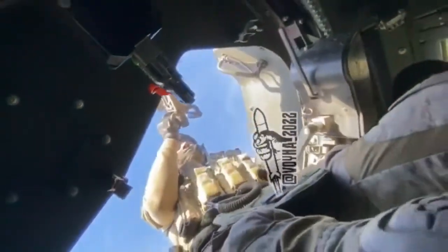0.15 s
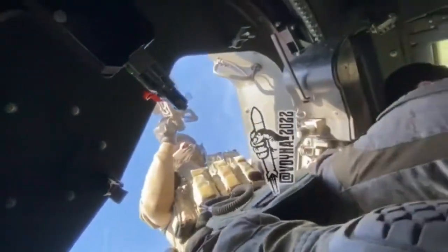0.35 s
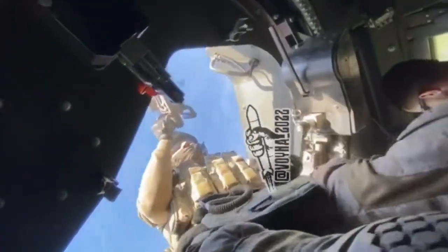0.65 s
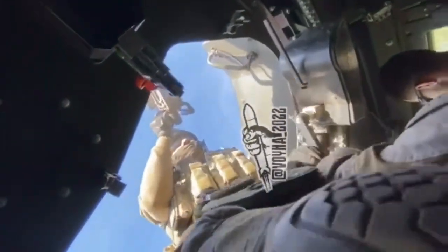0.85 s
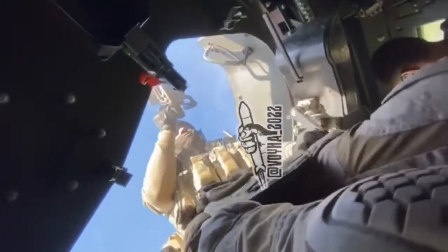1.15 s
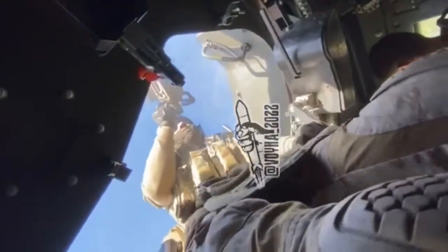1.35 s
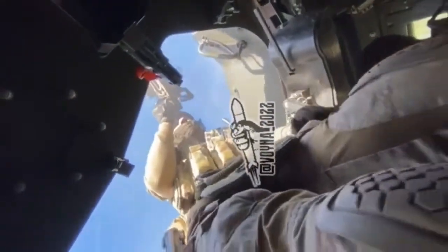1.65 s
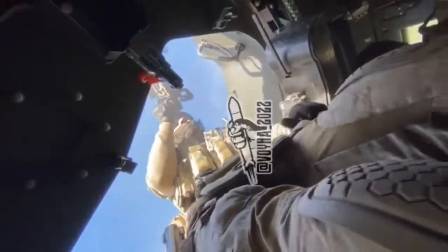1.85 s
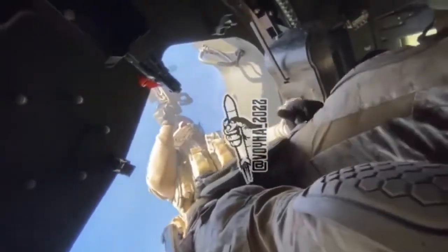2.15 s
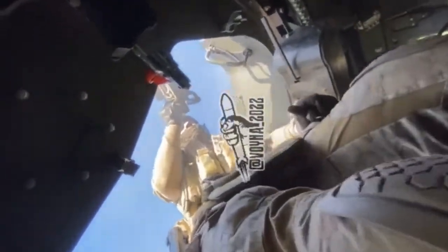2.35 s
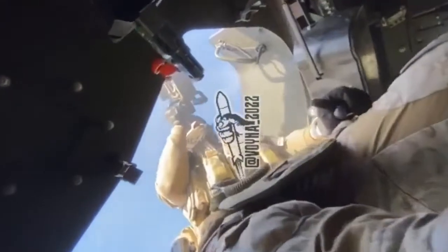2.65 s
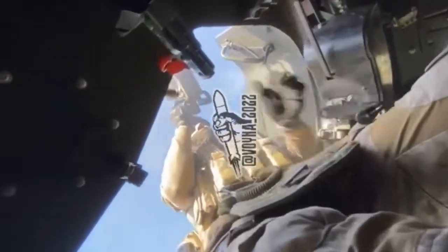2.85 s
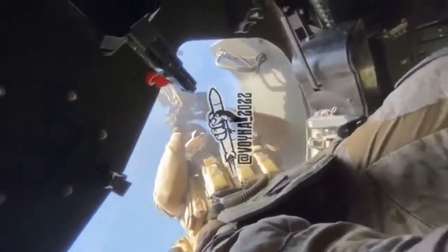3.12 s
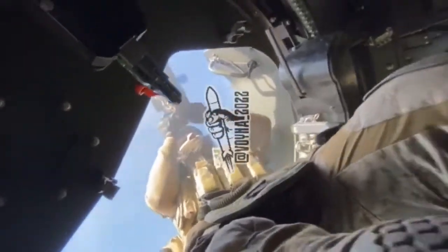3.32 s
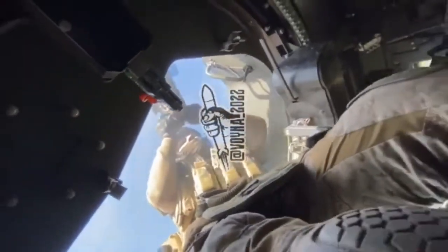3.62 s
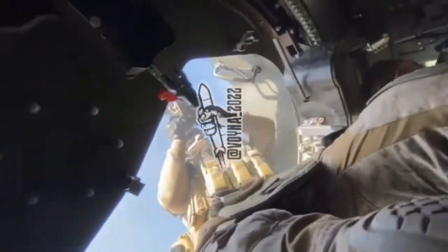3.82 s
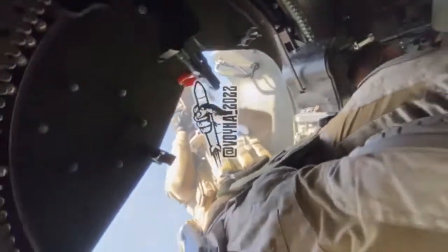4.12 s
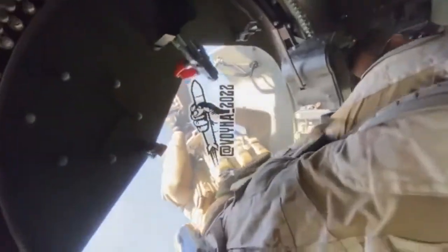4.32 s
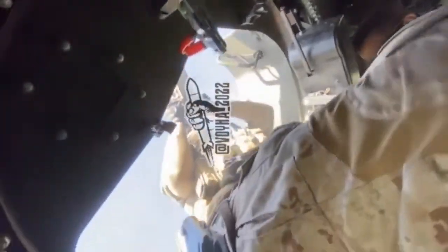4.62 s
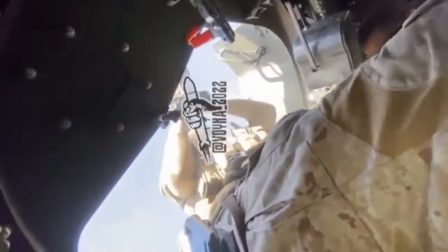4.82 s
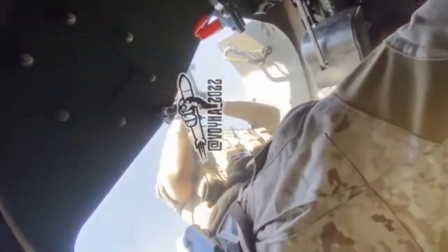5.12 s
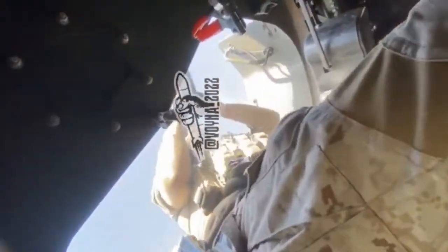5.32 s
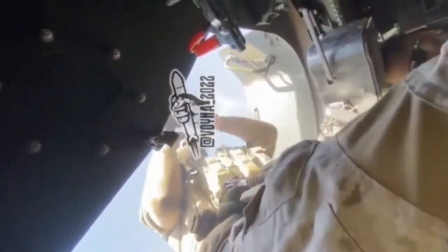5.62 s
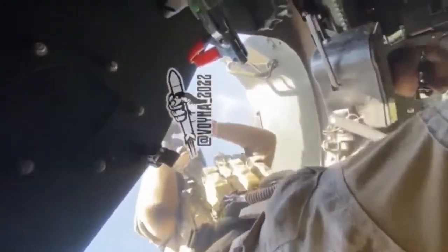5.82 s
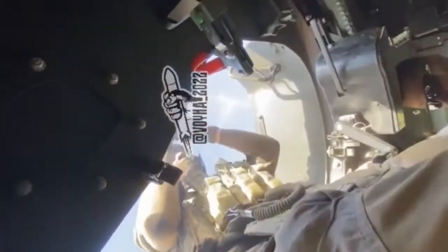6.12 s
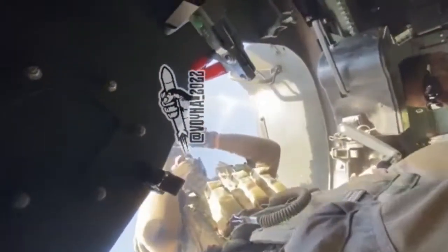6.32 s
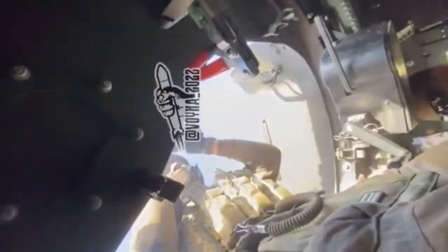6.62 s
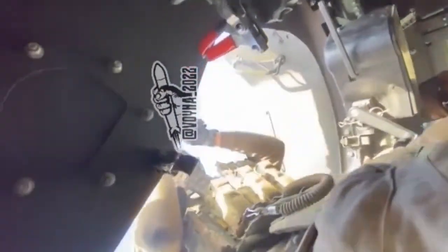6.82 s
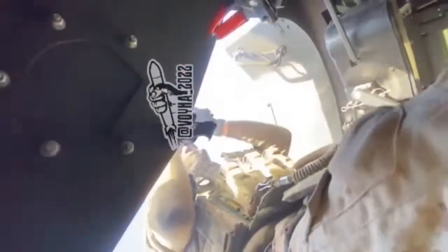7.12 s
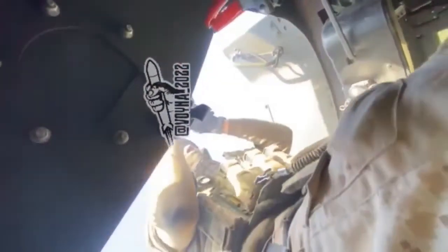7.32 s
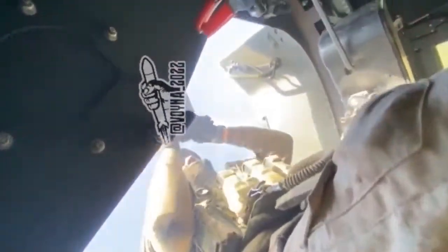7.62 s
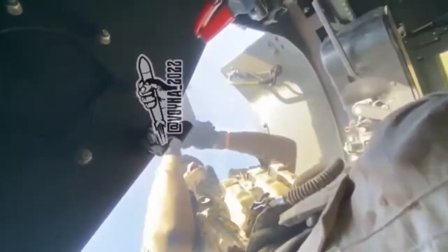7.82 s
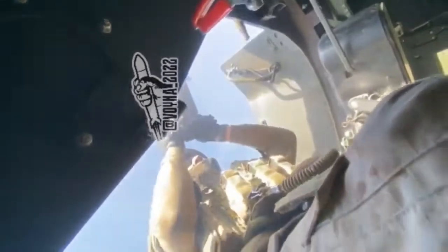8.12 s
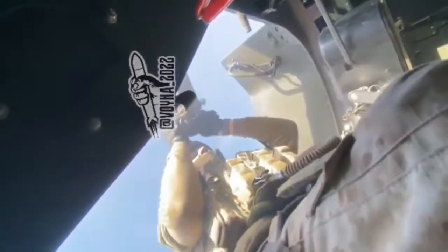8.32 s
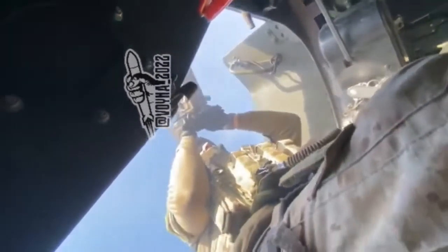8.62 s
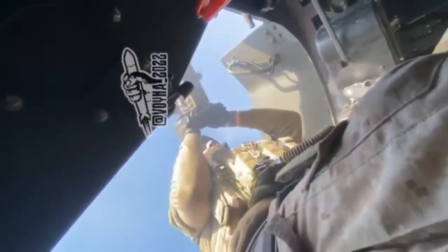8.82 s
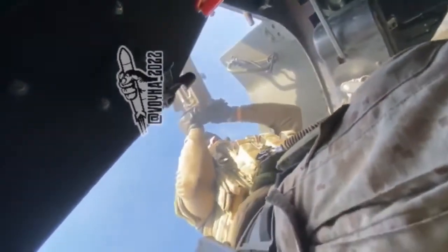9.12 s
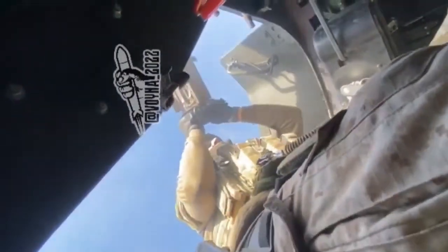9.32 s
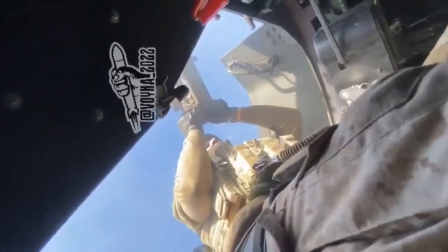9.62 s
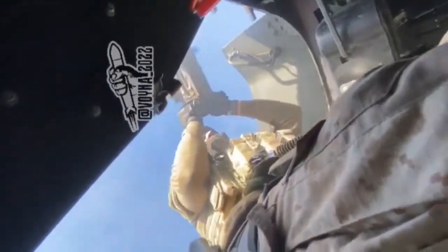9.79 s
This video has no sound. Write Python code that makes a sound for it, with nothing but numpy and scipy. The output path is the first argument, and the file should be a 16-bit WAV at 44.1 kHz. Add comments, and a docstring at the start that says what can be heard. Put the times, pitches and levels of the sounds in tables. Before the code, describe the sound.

Close, continuous heavy machine gun fire hammers through an open vehicle hatch, with clattering steel, clinking cases and a low rumble.

```python
"""Hard, booming shots hammer overhead: one long burst from a heavy machine gun on a vehicle's roof mount,
heard from the cabin under the open hatch. Each muzzle blast cracks through the hatch and booms in the
cabin air; between rounds the bolt slams back, drags the belt in and closes again. Spent metal clinks,
recoil shakes hull and mount, the standing vehicle rumbles, and a limiter flattens the blasts."""
import sys
import numpy as np
from scipy import signal
from scipy.fft import rfft, irfft
from scipy.io import wavfile
from scipy.ndimage import uniform_filter1d, minimum_filter1d

SR = 44100
rng = np.random.default_rng(int(sys.argv[2]) if len(sys.argv) > 2 else 0)


def unload_audio(sound):
    """Save the sound as a 16-bit wav file, at the path given as the first command line argument."""
    columns = np.transpose(np.atleast_2d(sound))
    # keep every value between -1 and 1, then stretch to whole-number steps
    steps = np.round(np.clip(columns, -1, 1) * 32767)
    wavfile.write(sys.argv[1], SR, steps.astype(np.int16))


N = 438794
SIZE, LEAD = 12288, 1024  # samples in a one-shot, and in its pre-roll
AGE = (np.arange(SIZE) - LEAD) / SR  # seconds since the hit
HZ, SCENE_HZ = np.fft.rfftfreq(SIZE, 1 / SR), np.fft.rfftfreq(N, 1 / SR)
SIDES = np.array([[.5], [-.5]])  # splits a left-minus-right level between the channels
SNAP_S = .0006  # attack of a sharp transient


def undb(db):
    """Decibels to gain."""
    return 10 ** (np.asarray(db) / 20)


def curve(points, hz=HZ):
    """Read (f/Hz, value) breakpoints on a log-frequency axis."""
    f, value = np.transpose(points)
    return np.interp(np.log(hz + 1), np.log(np.abs(f) + 1), value)


def level_at(times, points):
    """Read a (t/s, level/dB) fader ride at each round."""
    return np.interp(times, *np.transpose(points))[:, None, None]


def bell(hz, width_hz, db):
    """One resonance as an EQ bell, in dB over frequency."""
    return db / (1 + (2 * (HZ - hz) / width_hz) ** 2)


def causal(db):
    """Minimum-phase response with this gain: it rings only after the hit."""
    cepstrum = irfft(db * np.log(10) / 20)
    fold = 1 + np.sign(np.sin(2 * np.pi * np.arange(SIZE) / SIZE))
    return np.exp(rfft(cepstrum * fold))


def colour(x, db):
    """EQ by a dB shape scaled to unit mean power."""
    response = causal(db)
    return irfft(rfft(x) * response / np.sqrt(np.mean(np.abs(response) ** 2, axis=-1, keepdims=True)))


def blow(at, rise, t60):
    """Envelope that swells to a peak and dies away; all times in seconds."""
    gap = np.abs(AGE - at)
    return np.where(AGE < at, np.exp(-gap / rise), np.exp(-np.log(1000) * gap / t60))


def swell(times, at, span):
    """Share of a resonance that each round excites, fullest at one moment of the mount's turn."""
    return np.exp(-((times[:, None, None] - at) / span) ** 2)


def place(times, sounds):
    """Lay one stereo one-shot on the timeline at each time."""
    track = np.zeros((2, N + 2 * SIZE))
    for s, sound in zip(times, sounds):
        i = int(round(s * SR))
        track[:, i:i + SIZE] += sound
    return track[:, LEAD:LEAD + N]


# phase between the channels: f/Hz, left lead/rad
STEREO_PHASE = [(0, 0.34), (430, -0.0), (690, -1.9), (2580, -3.8), (4130, -8.2), (4650, -8.4), (5000, -9.3),
                (5860, -9.5), (8530, -8.9), (10100, -9.6)]
# how alike the channels are: f/Hz, coherence/0-1
STEREO_LIKENESS = [(25, 0.63), (70, 1), (160, 1), (320, 0.75), (600, 0.51), (1200, 0.16), (2500, 0.078),
                   (5000, 0.92), (10000, 0.76)]
def air_noise(count, size=SIZE):
    """Stereo white noise, tight in the bass and wide in the mids: (count, 2, size)."""
    hz = np.fft.rfftfreq(size, 1 / SR)
    left, other = rfft(rng.standard_normal((count, 2, size))).transpose(1, 0, 2)
    likeness = np.clip(curve(STEREO_LIKENESS, hz), 0, 1)
    lag = np.exp(-1j * np.interp(hz, *np.transpose(STEREO_PHASE)))
    right = (likeness * left + np.sqrt(1 - likeness ** 2) * other) * lag
    return irfft(np.stack([left, right], axis=1), size)


# tone of the idling vehicle: f/Hz, level/dB
IDLE_EQ = [(20, -14), (50, -4), (85, 0.5), (150, 0), (270, -18.5), (400, -6.5), (600, -15), (1500, -19.5),
           (2700, -24.5), (5000, -28), (9000, -34), (11000, -58.5)]
def idle(db=-36):
    """The standing vehicle's steady rumble, a bed under everything."""
    rumble = irfft(rfft(air_noise(1, size=N)[0]) * undb(curve(IDLE_EQ, SCENE_HZ)), N)
    return undb(db) * rumble / rumble.std()


# tone of steel hitting steel: f/Hz, level/dB
STEEL_EQ = [(120, -6.5), (300, 12), (450, 10), (700, 6.5), (1500, 0.5), (2600, 2), (4000, -2.5), (5500, -4),
            (7500, -11), (9500, -10.5), (11000, -52)]
# ringing modes of receiver, mount and links: f/Hz, level/dB, t60/s
STEEL_MODES = [(840, -3.5, 0.091), (1040, -2, .06), (2048, -1.5, .06), (2656, -0.5, 0.038),
               (3495, -4.5, 0.031), (4210, -1.5, 0.032), (4650, -1.5, 0.045), (6470, -5, 0.15)]
def steel(force, ring_db=-9, ripple_db=3.5, favour_db=5, detune=0.0065):
    """Steel parts clash under a force envelope: contact noise, plus the modes it sets ringing."""
    count = len(force)
    contact = air_noise(count) * force
    t = np.arange(SIZE) / SR
    # each hit lands on another spot and favours other resonances
    favour, stretch = rng.standard_normal((count, 2, len(STEEL_MODES), 1, 1)).transpose(1, 2, 0, 3, 4)
    modes = sum(undb(db + favour_db * lift) * np.sin(2 * np.pi * hz * (1 + detune * bend) * t)
                * np.exp(-np.log(1000) * t / t60)
                for (hz, db, t60), lift, bend in zip(STEEL_MODES, favour, stretch))
    ripple = rng.standard_normal((count, 1, len(HZ)))
    ripple = uniform_filter1d(uniform_filter1d(ripple, size=130), size=80)
    body = colour(contact, curve(STEEL_EQ) + ripple_db * ripple / ripple.std())
    ring = irfft(rfft(contact) * rfft(modes) / np.linalg.norm(modes, axis=-1, keepdims=True))
    return body + undb(ring_db) * ring


# cues for falling metal: t/s, level/dB, ring against contact/dB
CLINK_CUES = [(0.015, -27, -4), (0.099, -36, -8), (0.9333, -26, -6), (1.262, -32, -12), (1.765, -33, 1),
              (1.923, -35, -4), (2.097, -31, -15), (2.978, -31.5, -11), (3.393, -31, 2), (3.428, -41, -4),
              (3.504, -24, -14), (3.556, -22.5, -20), (3.9586, -22.5, -13), (4.661, -31.5, -6),
              (4.822, -31, -8), (5.194, -40, -8), (5.369, -33, -6), (5.656, -36, -7), (5.995, -37, -6),
              (6.129, -30.5, -15), (6.447, -33.5, -4), (6.758, -34, -5), (7.213, -35, -4), (7.367, -35, 3),
              (7.382, -30.5, -9), (7.847, -37, -5), (7.937, -34, -12), (7.964, -31, -12), (8.272, -32, -8),
              (9.168, -42, -8), (9.665, -37, 1)]
def clinks():
    """Spent cases and links land, each with a sharp tap and a short ring."""
    times, db, ring_db = np.transpose(CLINK_CUES)
    taps = undb(db)[:, None, None] * blow(0.0008, SNAP_S, 0.065)
    return place(times, steel(taps, ring_db[:, None, None]))


def chatter(count, per_s=170, spread_db=3, fade_s=.005, scrape=.45):
    """Envelope of loose steel: quick knocks of uneven size over a steady scrape."""
    hits = rng.random((count, 1, SIZE)) < per_s / SR
    sizes = undb(spread_db * np.clip(rng.standard_normal(hits.shape), -2, 2))
    energy = signal.lfilter([1], [1, -np.exp(-1 / SR / fade_s)], hits * sizes ** 2)
    return np.sqrt(scrape + (1 - scrape) * energy / energy.mean())


def bolt(times, feed_db, last_cycle_s=0.15, jitter_s=0.006, link_db=-38, link_count=4):
    """The bolt locks just before the shot, hits the buffer, pulls the belt and runs home; links tick."""
    cycle = np.append(np.diff(times), last_cycle_s)[:, None, None]
    slip = jitter_s * rng.standard_normal((len(times), 3)).T[..., None, None]
    lock = undb(-24) * blow(-0.0033, 0.0027, 0.045)
    buffer = undb(-32.5 + 0.17 * (feed_db - feed_db.mean())) * blow(0.047 + slip[0], 0.019, 0.12)
    belt = undb(feed_db + 6) * blow(0.108 + slip[1], 0.0098, 0.25)
    forward = undb(feed_db + 5.5) * blow(cycle - 0.014 + slip[2], 0.01, 0.29)
    ticks = rng.uniform(0.039, 0.21, (len(times), link_count)).T[..., None, None]
    link_power = sum((undb(link_db) * blow(at, .0003, 0.034)) ** 2 for at in ticks)
    rattle_power = chatter(len(times)) ** 2 * (buffer ** 2 + belt ** 2 + forward ** 2)
    return steel(np.sqrt(lock ** 2 + rattle_power + link_power))


# peaks and notches of the hatch:
# f/Hz, width/Hz, level/dB, fullest at t/s, fade span/s, left minus right/dB, slide/(Hz/s)
HATCH_BANDS = [(285, 80, 6.5, 7.02, 1.77, 1.5, -3), (346, 20, 2.5, 7.8, 2, -2.5, 0),
               (442, 87, 6, 8.6, 3.2, 4, -3.5), (470, 67, 4, 5.1, 1.1, -1, -2),
               (521, 70, -8, 0.92, 3.5, 3.5, 9.5), (470, 220, -3.5, 3.9, .8, 0.5, -1),
               (520, 57, -3.5, 6.1, .6, 1, 0), (557, 40, 7.5, 7.6, 1.9, 1.5, 0),
               (587, 66, 8.5, 4.4, 0.62, -4, -3), (656, 74, 10.5, 7, 1.52, -6, -4),
               (747.4, 115, 5, 0.9, 6.3, -7.1, 15), (765, 320, 4.5, 0.2, 5.6, -0.6, -17),
               (820, 82, 8, 7, 1.1, 6.5, -7), (850, 78, 0.5, 3.07, 0.97, -2, 4),
               (976, 41, 6, 7.8, 1.2, -4, 9), (980, 70, 3, 3.5, 1.6, 1, 3.5),
               (960, 46, 1.5, 0.1, 0.9, 5.5, 7), (1187, 115, 8, 4.26, 3.6, -2, 2.5),
               (1243, 190, 8.5, 9.5, 0.53, -4, -3), (1430, 240, 4, 5.05, 0.91, -2.5, 1.5),
               (1528, 110, 9.5, 1.5, 2.2, -2.5, 10), (2167, 64, 5, 2, 1, -2.5, -1),
               (1550, 65, 7.5, 7.7, 1.8, -2.5, 4.5), (1910, 38, 1.5, 2, 0.57, 5, -9),
               (2084, 84, 4.5, 0.6, .7, 7.5, 3.5), (2250, 180, 4, 0.2, 9.5, -0.5, -19.5),
               (2260, 100, 8.5, 9.05, 0.52, -1, 33), (2520, 150, 8, 9.55, .7, 0, 50),
               (2680, 530, 4, 6, 6, 0, -21.5), (3000, 58, 3.5, 0.22, .5, 5, 9),
               (3140, 230, 11.5, 2.8, 0.27, -4, 0), (3180, 170, 1, 8.7, 2.7, -1.5, 3.5),
               (3430, 56, 9, 5, 0.41, 9, -6), (4030, 140, 0.5, 2.8, 2.1, -11.8, 24.5)]
def hatch_eq(times):
    """The hatch's EQ in dB per round and channel: resonances swell, slide and fade as the mount turns."""
    gains, shapes = [], []
    for hz, width_hz, db, at, span, pan_db, slide in HATCH_BANDS:
        gains.append((db + pan_db * SIDES) * swell(times, at, span))
        shapes.append(bell(hz + slide * (times[:, None] - at), width_hz, 1))
    return np.concatenate(gains, axis=-1) @ np.stack(shapes, axis=1)


def flatten(x, amount=0.86, bins=23):
    """Iron out a noise burst's chance spectral peaks, so that the EQ after it decides its colour."""
    power = uniform_filter1d(np.abs(rfft(x)) ** 2, size=bins)
    power = np.maximum(power / power.mean(axis=-1, keepdims=True), 1e-4)
    return irfft(rfft(x) * causal(-10 * amount * np.log10(power)))


# tone of the shock front: f/Hz, level/dB
CRACK_EQ = [(150, -31), (350, 8), (550, 0), (800, -2), (1100, -2), (1700, -7), (2400, -10), (4000, -12.5),
            (5500, -14), (7200, -19.5), (9500, -25.5), (11000, -53), (15500, -66)]
def crack(hatch_db, trim_db=-8, t60=0.046, memory=0.889, fresh_hz=2600, bite_db=0.8, bite_hz=4500):
    """The shock front scatters round the cabin; its pattern drifts slowly, its treble is new each round."""
    count = len(hatch_db)
    pattern = air_noise(count)
    for k in range(1, count):
        pattern[k] = memory * pattern[k - 1] + np.sqrt(1 - memory ** 2) * pattern[k]
    carried = 0.86 / (1 + (HZ / fresh_hz) ** 2)
    scatter = irfft(rfft(pattern) * np.sqrt(carried) + rfft(air_noise(count)) * np.sqrt(1 - carried))
    # direct hit, then slaps off rim, floor, wall and roof: t/s, level/dB
    arrivals = [(0, 1.5), (0.0017, 0), (0.0058, -4), (0.0095, -4), (0.014, -7)]
    early_power = sum((undb(db) * blow(at, SNAP_S, t60)) ** 2 for at, db in arrivals)
    tail = undb(-18) * blow(0.014, .003, 0.18)
    burst = flatten(scatter * np.sqrt(early_power + tail ** 2))
    # a steeper shock front gives some rounds more bite
    bite = bite_db * rng.standard_normal((count, 1, 1)) * HZ ** 2 / (HZ ** 2 + bite_hz ** 2)
    return undb(trim_db) * colour(burst, curve(CRACK_EQ) + hatch_db + bite)


# tone of the pressure wave in the cabin: f/Hz, level/dB
BOOM_EQ = [(25, -35.5), (50, -20.5), (80, 1.5), (120, 4), (170, 4.5), (230, -2.5), (330, -3.5), (420, -1),
           (490, -1.5), (570, -21.5), (800, -17.5), (1250, -18.5), (2200, -46.5), (6000, -100)]
# standing waves and nulls of the cabin: f/Hz, width/Hz, level/dB
CABIN_MODES = [(189, 55.4, 7.5), (213.4, 16, -1.5), (230.4, 16.8, 6), (273.7, 46, 6), (302.5, 9.1, -13),
               (358, 58, 3.5), (389, 19.4, -13.5), (406, 13, 4), (480, 12, -1.5)]
def boom(hatch_db, trim_db=-8, start_s=0.00091, late_s=0.014675, late_hz=135, echo_s=0.0038):
    """One pressure wave rings the cabin every round; the lows arrive late, so it sweeps downward."""
    body_db = curve(BOOM_EQ) + sum(bell(*mode) for mode in CABIN_MODES)
    delay_s = start_s + late_s / (1 + ((HZ - late_hz) / 75) ** 2) + LEAD / SR
    sweep = np.exp(-2j * np.pi * np.cumsum(delay_s) * HZ[1])
    # the far wall's echo meets left and right in opposite polarity
    echo = 0.07 * np.exp(-2j * np.pi * HZ * echo_s) * np.array([[1], [-1]])
    wave = irfft(causal(body_db + hatch_db) * sweep * (1 + echo))
    punch = wave[..., (AGE > 0) & (AGE < .035)]
    return wave * undb(trim_db) / np.sqrt(np.mean(punch ** 2))


def gust(count, db=-28, corner_hz=75):
    """The blast's gust buffets left and right separately with a low thud."""
    puff = rng.standard_normal((count, 2, SIZE)) * blow(0.0088, 0.0045, 0.21)
    return undb(db) * colour(puff, -20 * np.log10(1 + (HZ / corner_hz) ** 2))


# tone of the drumming plates: f/Hz, level/dB
HULL_EQ = [(20, -5.5), (35, -6.5), (54, 0), (75, 0), (110, 0), (190, -0.5), (260, -8), (390, -2.5),
           (600, -14.5), (1500, -52.5)]
# slow modes of roof and cabin: f/Hz, level/dB, peak after shot/s, t60/s, fullest at t/s, fade span/s
HULL_MODES = [(53.1, -25, 0.034, 0.34, 5.1, 26), (148.7, -30.5, 0.05, 0.15, 1.2, 5.5),
              (188.3, -26.5, 0.053, 0.18, 1.8, 13), (223, -32, 0.033, 0.22, 14, 6.8),
              (310.5, -28, 0.036, 0.081, 8.8, 2.6), (365.5, -27, 0.059, 0.12, 9, 2.1),
              (462, -35.5, 0.052, 0.17, 8.8, 1.1)]
def hull(times, drum_db=-30, rise_s=0.015, detune=0.011):
    """Recoil shakes the hull: its plates drum and its modes hum on, slightly retuned each round."""
    drum = colour(air_noise(len(times)) * blow(0.034, 0.05, 0.27), curve(HULL_EQ))
    stretch = 1 + detune * rng.standard_normal((len(times), 1, 1))
    hum = sum(undb(db) * np.sin(2 * np.pi * hz * stretch * AGE)
              * blow(peak_s, rise_s, t60) * swell(times, at, span)
              for hz, db, peak_s, t60, at, span in HULL_MODES)
    return undb(drum_db) * drum + hum


# fader ride on the mount's ring: t/s, level/dB
MOUNT_RIDE = [(0, -25.5), (1.8, -27), (2.4, -24), (3.1, -26), (3.5, -30), (4.9, -32.5), (5.3, -27.5),
              (6.8, -27.5), (8.1, -32), (8.6, -28), (9.9, -27)]
def mount(times, hz=399, detune=0.0078):
    """The bolt's blow on the buffer sets the mount ringing on one note."""
    pitch = hz * (1 + detune * rng.standard_normal((len(times), 1, 1)))
    ring = np.sin(2 * np.pi * pitch * AGE) * blow(at=0.057, rise=0.015, t60=0.14)
    return undb(level_at(times, MOUNT_RIDE)) * ring


# cues for the rounds: t/s, boom trim/dB, crack trim/dB, belt-feed level/dB
SHOT_CUES = [(0.038, 3.5, 1.5, -48.5), (0.1987, 2, 1, -45), (0.359, 0, -0.8, -45.5),
             (0.523, 1.5, -0.5, -45.5), (0.673, -0.5, -1.5, -46), (0.837, 3, 1.5, -40),
             (0.9934, 2, 1, -46.8), (1.1525, 1.5, 1, -44.5), (1.3118, 1.5, 1.3, -42.5),
             (1.4672, 1, 0.5, -43), (1.6318, 0, 1, -51.5), (1.792, -1.0, -0.1, -44.4),
             (1.945, -2, -1.3, -50), (2.1188, -1, -1.8, -47.5), (2.271, -3.5, -1.1, -46.5),
             (2.429, -1, -2, -41), (2.5833, 0, -0.3, -42), (2.736, 3.5, 0.3, -47), (2.8978, 2, 2, -43.5),
             (3.053, 2, 0.5, -44), (3.209, -1.5, 0.5, -43.5), (3.361, -0.5, -2.4, -37.5),
             (3.516, -0.5, -1.1, -41.5), (3.674, 0, -1, -44), (3.831, 0.8, 0, -41.5),
             (3.9864, 1.5, 1.3, -46.5), (4.145, -0.5, -1.9, -48), (4.298, 0, -0.5, -45),
             (4.4614, -3, -1.2, -50), (4.619, -1.0, -1.5, -44.5), (4.7753, 0, 0, -46.6),
             (4.9361, -1.5, -2.6, -48.5), (5.0941, -0.5, -0.7, -51.5), (5.257, 0.0, 1.7, -51),
             (5.406, -0.8, -1.9, -44), (5.562, 1, 1.6, -46), (5.719, 0.0, -0.5, -45.5),
             (5.871, -2, -0.3, -43), (6.034, 1.5, 0.8, -41.5), (6.182, 1, -0.6, -41), (6.333, -1.5, 1, -44),
             (6.4869, 0.5, -1, -43.3), (6.64, -0.5, 0, -48), (6.794, 0.0, -1, -42.2),
             (6.9445, -2, -1.4, -43.5), (7.1017, 0.5, 1.5, -42), (7.257, -1.5, -0.5, -48),
             (7.4104, 1.5, -0.5, -43), (7.5656, 1, 0.2, -40), (7.7179, -1.2, -1.0, -42),
             (7.8723, -1, -0.7, -41), (8.024, -0.5, 0.1, -42.5), (8.1753, -0.5, 1, -43.5),
             (8.3323, 0, 2.4, -40), (8.484, 1.5, 2, -42.7), (8.636, 0.5, 2.8, -42.5),
             (8.7879, 0.5, -0.3, -41.5), (8.944, -0.5, -0.2, -40.5), (9.102, -2, -1.5, -42),
             (9.2533, -3.5, -3, -42), (9.4039, -1, -1.2, -41), (9.5553, -3, -1.9, -43),
             (9.708, -2.5, -1.4, -43.0), (9.8617, -3.0, -2.5, -35)]
# fader ride on the boom as the mount turns: t/s, level/dB
BOOM_RIDE = [(0, -1.5), (1.3, -0.5), (2.1, -0.5), (2.8, 0), (3.4, -1), (5, 0), (7, -4), (8.1, -2.5),
             (8.5, -1), (9.9, 2.5)]
def gunfire():
    """The burst: every round stacks the muzzle blast, the mechanism and the shaken vehicle."""
    times = np.transpose(SHOT_CUES)[0]
    boom_db, crack_db, feed_db = np.transpose(SHOT_CUES)[1:, :, None, None]
    hatch_db = hatch_eq(times)
    booms = undb(boom_db + level_at(times, BOOM_RIDE)) * boom(hatch_db)
    cracks = undb(crack_db) * crack(hatch_db)
    rounds = booms + cracks + bolt(times, feed_db) + gust(len(times)) + hull(times) + mount(times)
    return place(times, rounds)


# pan of the mix by frequency: f/Hz, left minus right/dB
STEREO_BALANCE = [(60, -.2), (180, 1.3), (300, .2), (450, 1.5), (600, -2.5), (800, -4), (1200, -2),
                  (2500, -1.2), (5000, .2), (9000, .7)]
def scene():
    """Gunfire, falling metal and rumble, mixed and panned band by band."""
    mix = gunfire() + clinks() + idle()
    pan_db = curve(STEREO_BALANCE, SCENE_HZ) * SIDES
    return irfft(rfft(mix) * undb(pan_db), N)


def record(dry, ceiling=0.83, window=89, top_hz=15700):
    """A fast, stereo-linked limiter holds the peaks down, then a steep low-pass cuts the top."""
    gain = np.minimum(1, ceiling / (np.abs(dry).max(axis=0) + 1e-9))
    gain = uniform_filter1d(minimum_filter1d(gain, size=window), size=window)
    return signal.sosfilt(signal.ellip(8, .2, 70, top_hz, fs=SR, output="sos"), dry * gain)


dry = scene()
out = record(dry)
unload_audio(out)
```